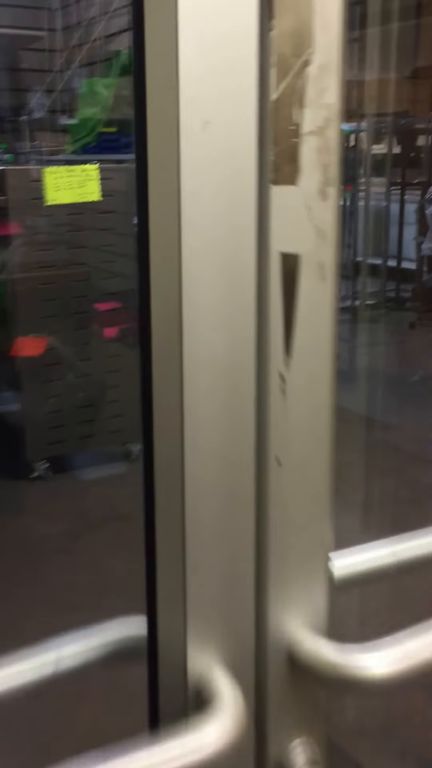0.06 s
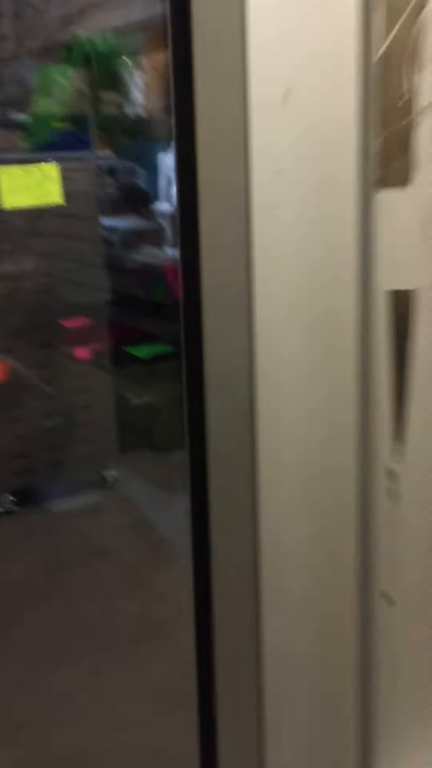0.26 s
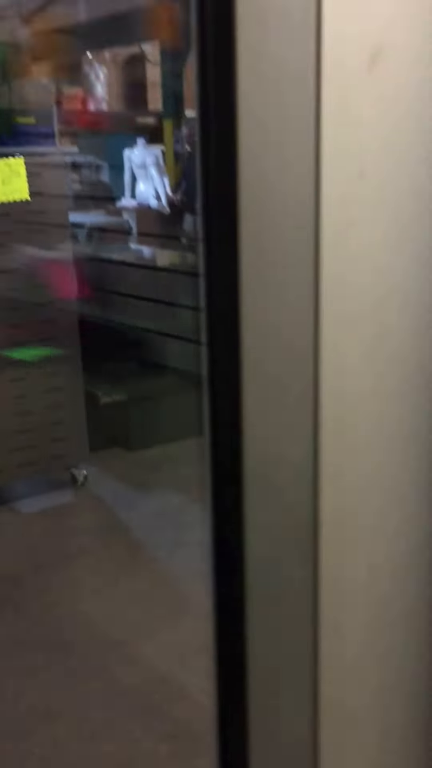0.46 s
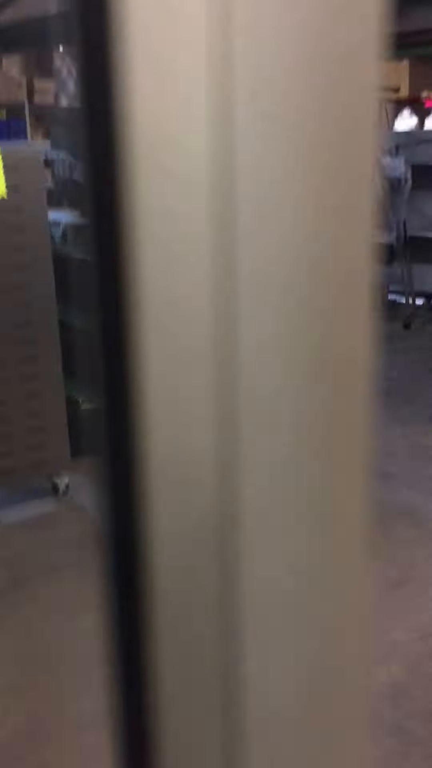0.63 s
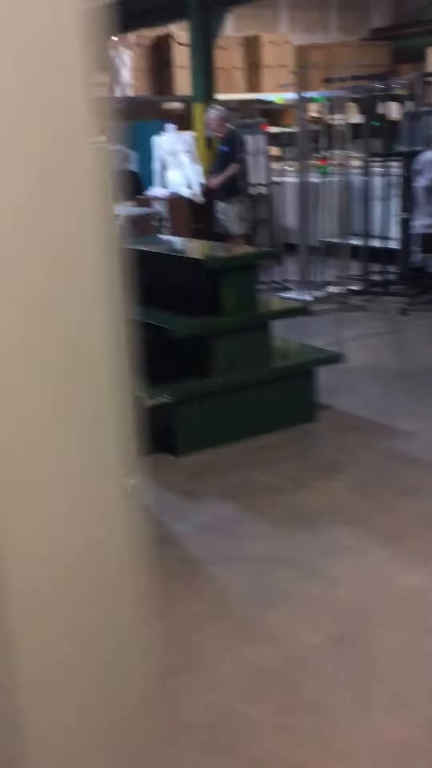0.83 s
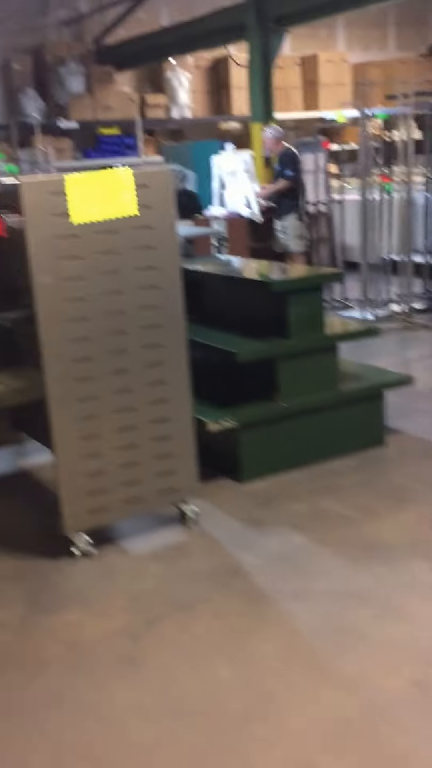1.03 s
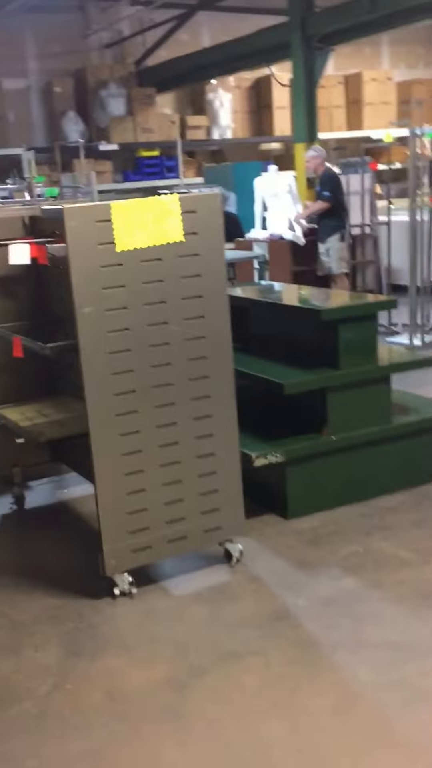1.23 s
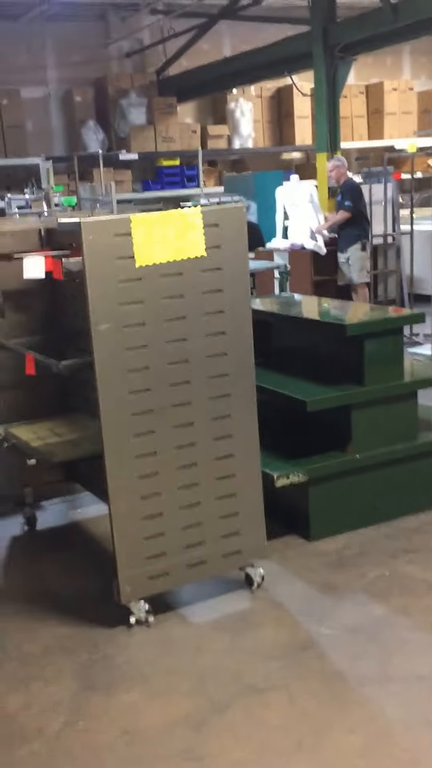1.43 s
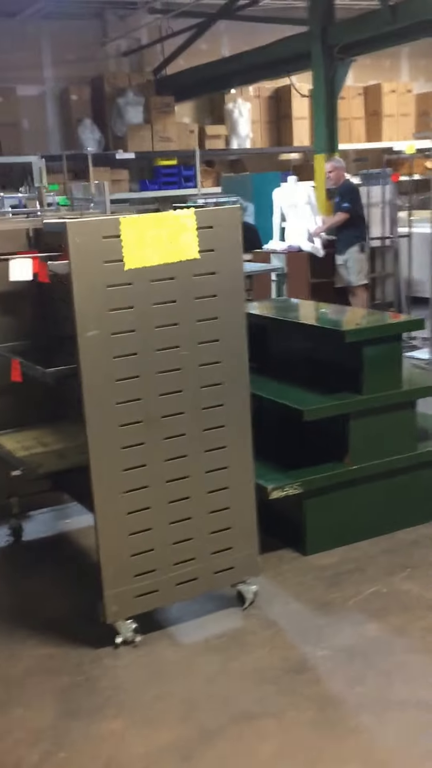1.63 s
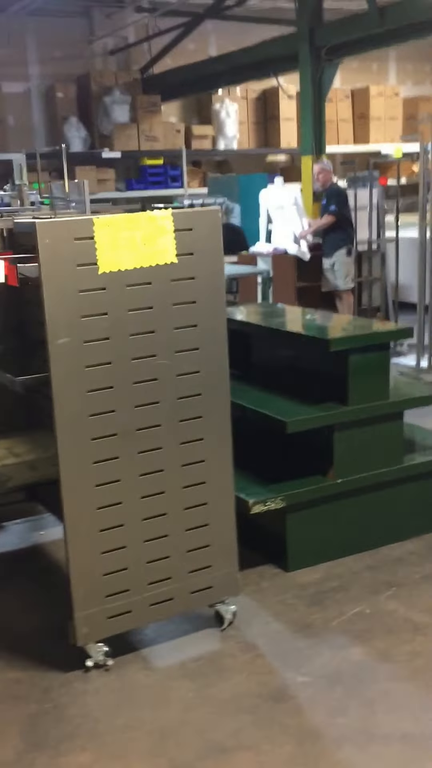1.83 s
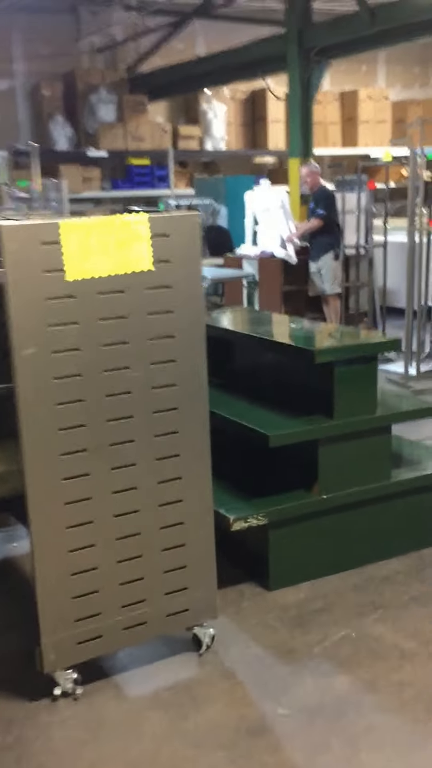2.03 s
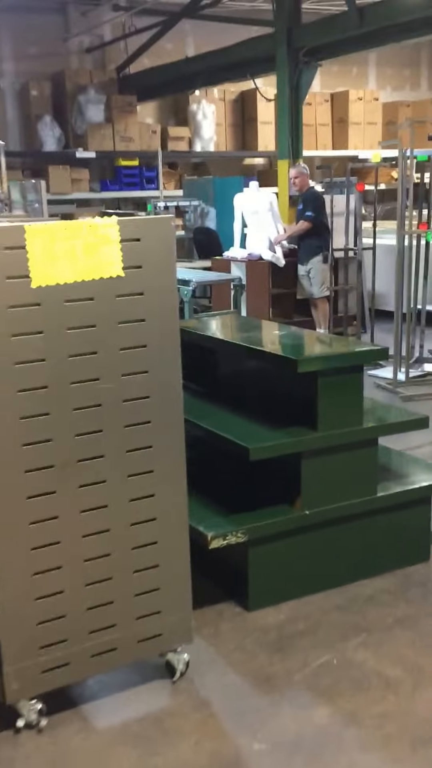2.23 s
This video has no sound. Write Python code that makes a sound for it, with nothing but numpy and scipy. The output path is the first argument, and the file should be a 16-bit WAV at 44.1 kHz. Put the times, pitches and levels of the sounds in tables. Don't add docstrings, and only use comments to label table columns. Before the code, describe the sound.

A metal-framed glass door clunks open with a shudder, then clicks, ticks and soft knocks follow

```python
import sys
import numpy as np
from scipy import signal
from scipy.fft import rfft, irfft
from scipy.io import wavfile

SR = 44100
rng = np.random.default_rng(int(sys.argv[2]) if len(sys.argv) > 2 else 0)


def generate_wav(signal):
    frames = np.transpose(np.atleast_2d(signal))
    scaled = np.clip(frames, -1, 1) * 32767
    pcm = np.round(scaled).astype(np.int16)
    wavfile.write(sys.argv[1], SR, pcm)


def boost(x):
    u = np.asarray(x, float) / 20
    return 10 ** u


N = 100680
T = np.arange(N) / SR


def unit(x):
    return x / np.sqrt(np.mean(x ** 2) + 1e-30)


def band(x, hz, width):
    hz = min(hz, 0.4 * SR)
    sharpness = hz / np.clip(width, 1, 0.4 * SR)
    return signal.lfilter(*signal.iirpeak(hz, sharpness, fs=SR), x)


def steep(x, hz, width, env=1):
    top = signal.butter(2, min(hz * 1.53, 0.45 * SR), fs=SR)

    def shape(v):
        return signal.lfilter(*top, band(band(v, hz, width), hz, width))

    return shape(x * env) / np.sqrt(np.mean(shape(x) ** 2))


def ring(force, modes):
    out = 0
    for hz, db, t60 in modes:
        pole = np.exp(2j * np.pi * hz / SR - np.log(1000) / (t60 * SR))
        out = out + boost(db) * signal.lfilter([1], [1, -pole], force).imag
    return out


def fade(start, t60):
    return (T >= start) * 1000. ** (-np.clip(T - start, 0, None) / t60)


def plateau(start, length, t60):
    attack_s = 0.0017
    attack = np.clip((T - start) / attack_s, 0, 1) ** 2
    release = np.minimum(1, 1000. ** np.minimum((start + length - T) / t60, 0))
    return attack * release


def grit():
    grains_per_s, spread_db = 9000, 2.0
    hit = rng.random(N) < grains_per_s / SR
    clicks = hit * rng.standard_normal(N)
    size = boost(spread_db * np.minimum(rng.exponential(size=N), 4))
    return unit(clicks * size)


def walk(rate):
    return unit(signal.lfilter(*signal.butter(2, rate, fs=SR), rng.standard_normal(N)))


# (f/Hz, level/dB per Hz)
HALL_TONE = [(15, -63), (25, -19), (84, -4), (309, -24), (887, -29.5), (962, -29), (1160, -27),
             (1400, -30.5), (16000, -50.5)]
# (t/s, hum level/dB, rumble level/dB)
OPENING = [
    (0.099, -0.5, -2),
    (.3, 2, 2),
    (1.9, 1, -0.5),
    (2.049, 0, -8),
]


def hall():
    hum_level_db, rumble_level_db, rumble_hz, rumble_width_hz = -61, -56.5, 68.5, 73
    f = np.maximum(np.arange(N // 2 + 1) * SR / N, 1)
    tone_hz, tone_db = np.transpose(HALL_TONE)
    shape = boost(np.interp(np.log(f), np.log(tone_hz), tone_db))
    hum = unit(irfft(rfft(rng.standard_normal(N)) * shape, N))
    rumble = band(rng.standard_normal(N), rumble_hz, rumble_width_hz)
    rumble = unit(band(rumble, rumble_hz, rumble_width_hz))
    s, hum_db, rumble_db = np.transpose(OPENING)
    hum_gain = boost(hum_level_db + np.interp(T, s, hum_db) + walk(18))
    rumble_gain = boost(rumble_level_db + np.interp(T, s, rumble_db) + 0.69 * walk(1.5))
    return hum_gain * hum + rumble_gain * rumble


# (t/s, length/s, level/dB, f/Hz, width/Hz)
SQUEAKS = [
    (0.001, 0.24, -65.5, 234, 25),
    (0.143, 0.021, -54.5, 533, 115.5),
    (0.64, 0.018, -63, 1260, 200),
    (.746, 0.016, -64, 5800, 990),
    (0.752, 0.02, -52, 1330, 415),
    (0.766, 0.027, -52.5, 617, 402),
    (1.604, 0.0047, -79, 5800, 850),
    (1.497, 0.014, -64, 2860, 495),
    (1.51, .05, -79, 11160, 248),
    (1.538, 0.012, -55, 530, 119),
]


def squeaks():
    out = 0
    for s, length, db, hz, width in SQUEAKS:
        out = out + boost(db) * steep(grit(), hz, width, plateau(s, length, 0.071))
    return out


# (t/s, length/s, level/dB, f/Hz)
RUSTLES = [
    (0.105, 0.022, -55, 1580),
    (0.441, 0.0089, -51, 2480),
    (0.488, 0.032, -60, 3880),
    (1.315, 0.058, -64, 1790),
    (1.382, 0.053, -65, 1600),
    (1.672, 0.049, -66.5, 1500),
    (1.792, 0.041, -56.5, 2200),
]


def rustles():
    out = 0
    for s, length, db, hz in RUSTLES:
        swell = np.clip((T - s) / length, 0, 1) ** 0.7 * plateau(s, length, 0.024)
        out = out + boost(db) * steep(grit(), hz, hz * 1.6, swell)
    return out


# (t/s, length/s, level/dB, f/Hz, tail t60/s)
RUBS = [(.118, 0.063, -47, 2180, 0.092), (.119, 0.029, -45.5, 172, 0.26), (0.122, 0.045, -48.5, 950, 0.11),
        (0.123, 0.045, -53, 5300, 0.12), (0.353, 0.07, -56, 1440, 0.22), (0.357, 0.014, -61.5, 9000, 0.26),
        (0.46, 0.062, -52, 845, 0.11), (0.464, 0.049, -48.5, 2370, 0.055), (0.488, 0.023, -58, 4460, 0.07),
        (0.531, 0.082, -49.5, 238, 0.3), (0.616, 0.047, -63, 1930, 0.11), (0.742, 0.029, -59, 2230, 0.11),
        (1.083, 0.016, -62, 850, 0.039), (1.182, 0.017, -60, 590, 0.078), (1.289, 0.028, -50.5, 445, 0.084),
        (1.29, 0.0097, -63, 3540, 0.11), (1.472, 0.078, -60, 2550, 0.086), (1.525, 0.047, -57.5, 490, 0.17),
        (1.72, 0.025, -52, 279, 0.41), (1.722, 0.019, -48.5, 1390, 0.078), (1.81, 0.067, -61.5, 330, 0.086),
        (1.825, 0.028, -56, 2180, 0.098)]


def rubs():
    out = 0
    for s, length, db, hz, t60 in RUBS:
        grains = grit()
        pressure = plateau(s, length, t60) * boost(1.05 * walk(100))
        out = out + boost(db) * steep(grains, hz, hz * 1.7, pressure)
    return out


# (t/s, peak level/dB, f/Hz, t60/s)
PINGS = [(.119, -38, 200, 0.12), (.123, -37, 534, 0.11), (.130, -40.5, 2046, 0.097),
         (.147, -36.5, 1750, .03), (.178, -42, 1990, 0.043), (.353, -38, 1360, 0.028),
         (.354, -41, 2760, 0.035), (.356, -41.5, 2115, 0.034), (.363, -43, 2144, 0.053),
         (.372, -40, 398, 0.19), (.395, -40, 2080, 0.031), (.4, -44.5, 226, 0.98),
         (.468, -33.5, 2286, 0.06), (.469, -35.5, 940, 0.04), (.472, -34.5, 1834, .025),
         (.507, -40.5, 3680, 0.04), (.603, -48, 1153, 0.17), (0.626, -56, 1178, 0.12),
         (.644, -43.5, 740, 0.027), (.753, -42, 1278, .04), (.753, -48, 1560, 0.044),
         (.767, -37, 1155, .025), (.772, -34, 646, 0.02), (.781, -44, 658, 0.055), (.79, -47, 445, 0.042),
         (.852, -49.5, 2260, 0.027), (.949, -53, 2450, .03), (1.0135, -48.5, 2360, 0.029),
         (1.081, -47.5, 2370, 0.053), (1.309, -38.5, 394, 0.028), (1.273, -39.5, 2020, 0.033),
         (1.276, -47, 3300, 0.018), (1.284, -44, 1770, 0.02), (1.44, -48, 2150, 0.024),
         (1.507, -49, 2900, 0.03), (1.528, -51.5, 2520, 0.045), (1.548, -57, 504, 0.036),
         (1.571, -54, 2196, 0.022), (1.718, -37, 2075, 0.031), (1.72, -40, 1335, 0.026),
         (1.727, -40, 2340, 0.034), (1.729, -40.5, 1008, 0.073), (1.818, -36, 1520, 0.018),
         (1.818, -44, 5930, 0.014), (1.829, -48, 2570, .025), (1.872, -51.5, 2140, 0.046)]


def pings():
    rise_cycles = 0.56
    out = 0
    for s, db, hz, t60 in PINGS:
        t = np.clip(T - s, 0, None)
        soft_edge = 1 - np.exp(-t * hz / rise_cycles)
        out = out + boost(db) * np.sin(2 * np.pi * hz * t) * fade(s, t60) * soft_edge
    return out


# (t/s, level/dB, f/Hz, width as a share of f, t60/s)
CRACKS = [(0.1222, -35, 859, 0.23, 0.051), (0.3482, -37.5, 8100, 3.4, 0.0075),
          (0.353, -35, 4240, 1.3, 0.023), (0.3941, -42, 2220, 0.69, 0.049),
          (0.4507, -46, 5100, 0.29, 0.042), (0.4913, -36, 4100, 0.53, 0.038),
          (1.27, -42.5, 4340, 0.25, 0.065), (1.273, -36.5, 1290, 1.2, 0.066), (1.716, -37, 1700, 4, 0.058),
          (1.7157, -44, 7060, 1.2, 0.09), (1.813, -47.5, 4000, 0.37, 0.035),
          (1.8171, -41.5, 2330, 1.5, 0.11), (1.819, -53, 8200, 0.31, 0.055)]


def cracks():
    out = 0
    for s, db, hz, width, t60 in CRACKS:
        burst = fade(s, t60) * np.clip((T - s) / 0.001, 0, 1)
        out = out + boost(db) * steep(grit(), hz, hz * width * 1.92, burst)
    return out


# (t/s, level/dB, contact/ms)
BLOWS = [
    (0.3534, -26.5, 1.47),
    (0.3593, -28.5, 1.44),
    (0.373, -29, 1.71),
    (.396, -29, 1.6),
    (0.414, -33, 1.96),
    (0.467, -28, 2.84),
]
# (f/Hz, level/dB, t60/s)
LEAF_MODES = [(110.1, 0.5, 0.23), (177.4, -9.5, 0.7), (234.4, -1.5, 0.43), (299, -11.5, 0.088),
              (398, -4, 0.26), (540, -9, 0.06), (669, 1, 0.07)]
# (t/s, f/Hz, level/dB)
FLEX = [
    (0.38, 54.01, -39),
    (0.483, 59.55, -39.5),
    (0.94, 61.26, -55.5),
]


def leaf():
    force = 0
    for s, db, ms in BLOWS:
        push = np.exp(-((T - s - ms / 1e3) / (ms / 3240.0)) ** 2)
        force = force + boost(db) * push / (ms * SR / 1e3)
    rung = ring(force, LEAF_MODES)

    s, hz, db = np.transpose(FLEX)
    phase = 2 * np.pi * np.cumsum(np.interp(T, s, hz) * (1 + 0.017 * walk(17.5))) / SR
    beat_hz, beat_db, beat_peak_s = 17.2, 3, 0.352
    beat = boost(beat_db * np.cos(2 * np.pi * beat_hz * (T - beat_peak_s)))
    flex = beat * np.sin(phase)
    for k in (2, 3, 4):
        overtone_db = -10 * (k - 1) ** 0.5 + 6.6 * walk(15.6)
        flex = flex + boost(overtone_db) * np.sin(k * phase + k)
    edge = np.clip((T - s[0]) / 0.058, 0, 1) * np.clip((s[-1] - T) / 0.012, 0, 1)
    flex = np.sqrt(2) * flex * edge * boost(np.interp(T, s, db))

    rattle_db, rattle_hz, rattle_width_hz, rattle_t60_s = -45.5, 330, 710, 0.89
    rattle = steep(rng.standard_normal(N), rattle_hz, rattle_width_hz)
    rattle = rattle * fade(BLOWS[0][0], rattle_t60_s) * (1 + 2.04 * np.sin(phase))
    return rung + flex + boost(rattle_db) * rattle


# (t/s, level/dB)
CHATTER = [
    (0.4506, -18),
    (0.458, -27.5),
]
# (f/Hz, level/dB, t60/s)
LATCH_MODES = [(1135, -5, 0.017), (1866, -10, 0.075), (2130, -12, .08), (2494, 1.5, 0.045),
               (2704, -11, 0.11), (3120, -10, 0.014)]


def latch():
    catch_s, catch_db, push_hz, push_width_hz, body_hz = 0.4606, -13, 2440, 1610, 700
    kick = 0
    for s, db in CHATTER:
        kick = kick + boost(db) * np.exp(-((T - s - 0.0003) / 0.00008) ** 2)
    kick = band(kick / 5, push_hz, push_width_hz)
    kick = signal.lfilter(*signal.butter(2, body_hz, "high", fs=SR), kick)
    caught = np.interp(T, [catch_s, catch_s + 0.002], [0, catch_db])
    return boost(caught) * ring(kick, LATCH_MODES)


# (t/s, level/dB, f/Hz, t60/s)
THUMPS = [(0.792, -57, 330, 0.12), (0.827, -42, 117, 0.09), (0.863, -39, 138, 0.031),
          (0.9, -35, 66.5, 0.081), (1.001, -37, 330, 0.0073), (1.084, -44, 387, 0.046),
          (1.135, -46, 69.5, 0.06), (1.155, -37, 58.3, 0.058), (1.188, -39, 87, 0.11),
          (1.283, -41, 87.9, 0.45), (1.298, -30.5, 142.7, 0.095), (1.344, -43, 69.7, 0.19),
          (1.419, -47.5, 86.4, 0.25), (1.449, -36.5, 79.2, 0.23), (1.469, -35, 188, 0.087),
          (1.482, -31, 86, 0.1), (1.574, -43.5, 53.3, 0.1), (1.691, -42, 112, 0.054),
          (1.766, -39.5, 68.6, 0.17), (1.769, -44.5, 180, 0.073), (1.804, -41.5, 76, 0.08),
          (1.848, -48.5, 54, 0.16)]


def thumps():
    sag, rise_cycles = 0.25, 0.13
    out = 0
    for s, db, hz, t60 in THUMPS:
        t = np.clip(T - s, 0, None)
        cycles = hz * t * (1 - sag * t / (t + t60))
        soft_edge = (1 - np.exp(-t * hz / rise_cycles)) ** 2
        out = out + 2 * boost(db) * np.sin(2 * np.pi * cycles) * fade(s, t60) * soft_edge
    return out


# (t/s, level/dB, bright part level/dB, bounce level/dB)
TICKS = [(0.8255, -51.5, -14, -6), (0.851, -52.5, -10, -12), (0.8853, -46, -12, -26), (0.946, -40, 1.5, -6),
         (0.971, -49, -26, -6), (1.012, -38, 2.5, -14), (1.08, -36, 4, -26), (1.1553, -39, 2, -19),
         (1.2689, -34.5, -1, -6), (1.3509, -36, 5, -28), (1.4383, -38, 6, -11), (1.5706, -40, 11, -16)]
# (f/Hz, level/dB, t60/s)
ARM_MODES = [(1230, 4, 0.0029), (2340, -6.5, 0.014), (2720, -12, 0.0068), (3090, -6, 0.0073),
             (4350, -24, 0.036)]
# (f/Hz, level/dB, t60/s)
SPRING_MODES = [(6900, -21, 0.0093), (7940, -10.5, 0.0092), (10740, -16, 0.011)]


def closer():
    rattle_s, bounce_s, crack_db = 0.023, 0.0147, -3.5

    def burst(s):
        return fade(s, rattle_s * 3) * np.clip((T - s) / 0.0031, 0, 1)

    low = high = 0
    for s, db, bright_db, bounce_db in TICKS:
        hit = boost(db) * (burst(s) + boost(bounce_db) * burst(s + bounce_s))
        low = low + hit
        high = high + hit * boost(bright_db)
    rattle = grit()
    arm = 0.063 * ring(rattle * low, ARM_MODES)
    spring = 0.023 * ring(rattle * high, SPRING_MODES)
    crack = low * steep(grit(), 2600, 3300) + 0.29 * high * steep(grit(), 5200, 17000)
    return arm + spring + 0.23 * boost(crack_db) * crack


def room(air):
    level_db, t60_s, dark_hz = -15, 0.35, 4000
    tail = signal.lfilter(*signal.butter(1, dark_hz, fs=SR), rng.standard_normal(N))
    tail = tail * fade(0.0019, t60_s)
    return boost(level_db) * signal.fftconvolve(air, tail / np.sqrt(np.sum(tail ** 2)))[:N]


def scene():
    bolt, small_parts = latch(), pings()
    air = 0.26 * bolt + closer() + (rubs() + squeaks()) + cracks() + 0.4 * small_parts
    heard = air + 0.81 * bolt + room(air)
    return (heard + leaf() + thumps() + hall() + 0.6 * small_parts + rustles())[None]


def low_pass(x):
    return signal.sosfilt(signal.butter(12, 16520, fs=SR, output="sos"), x)


def record(dry):
    trim = signal.butter(2, 35, "high", fs=SR, output="sos")
    mix = signal.sosfilt(trim, dry)
    return low_pass(mix)


dry = scene()
out = record(dry)
generate_wav(out)
```